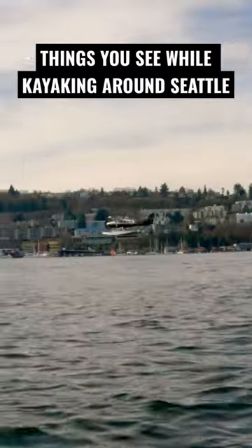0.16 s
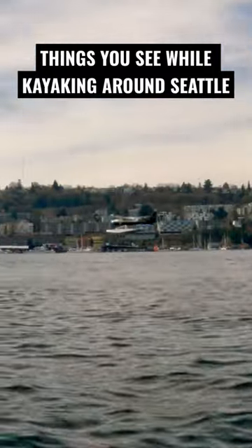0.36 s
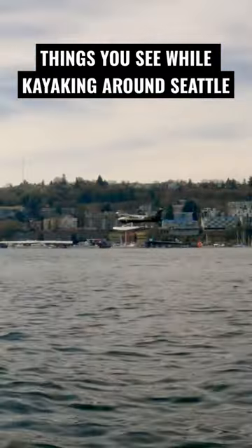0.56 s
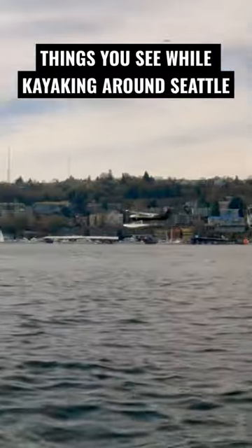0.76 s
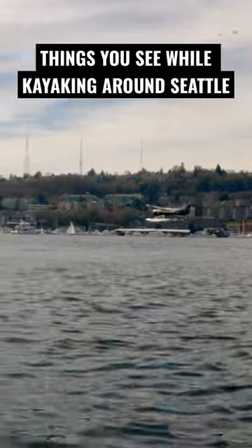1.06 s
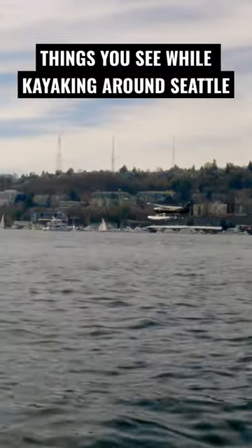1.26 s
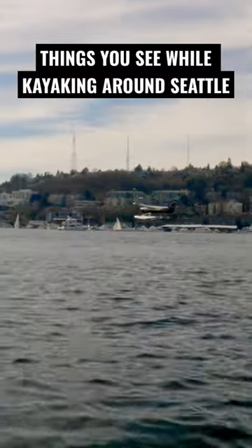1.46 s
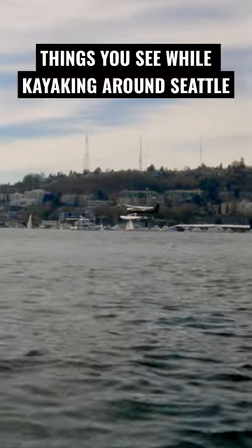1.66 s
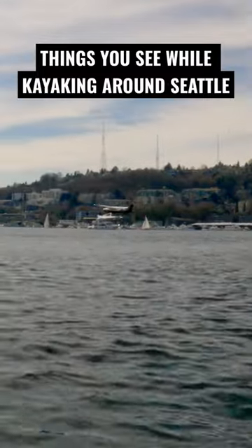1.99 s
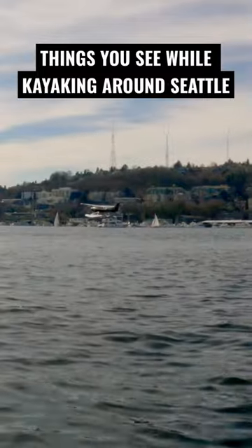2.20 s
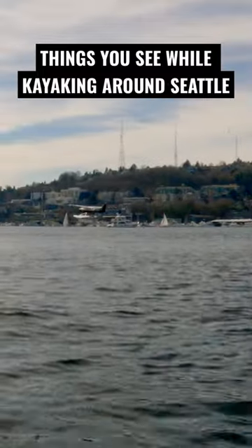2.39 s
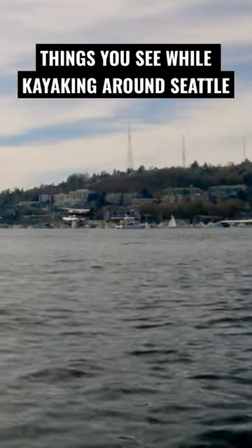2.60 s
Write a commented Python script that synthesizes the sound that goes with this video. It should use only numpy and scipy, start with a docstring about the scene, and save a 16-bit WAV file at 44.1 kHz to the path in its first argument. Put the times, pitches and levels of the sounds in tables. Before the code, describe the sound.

A small seaplane engine drones low across a lake, pitch sagging, while waves slap a kayak hull

```python
"""On a lake, from a kayak: a small seaplane drones low over the water, its pitch sagging as it moves away.
The engine is a stack of sines at multiples of its shaft rate, which swell and fade, over a roar of shaped noise.
Close by, noise bursts splash and tick on the hull and decaying sines make it thump.
Farther off, shaped noise and ringing bubbles make the waves, low noise the breeze, and one sine a faint hum.
Two closely spaced microphone ports hear it all, with small differences of level and phase."""
import sys
import numpy as np
from scipy.fft import rfft, irfft, next_fast_len
from scipy.io import wavfile
from scipy.ndimage import map_coordinates

SR = 44100
rng = np.random.default_rng(int(sys.argv[2]) if len(sys.argv) > 2 else 0)


def transcribe(signal):
    """Save signal, clipped to [-1, 1], as a 16-bit WAV file at the path in sys.argv[1]."""
    frames = np.atleast_2d(signal).T
    limited = np.clip(frames, -1, 1)
    pcm = np.round(limited * 32767).astype(np.int16)
    wavfile.write(sys.argv[1], SR, pcm)


N = 120834

# THE SEAPLANE
# Firing rate of the engine, twice the shaft rate: start_s, pitch_hz
FIRING_RATE = [(0, 93.64), (.3, 92.04), (.5, 91.93), (.8, 90.1), (1.1, 88.94), (1.55, 88.85), (1.75, 87.4),
               (2.3, 86.9), (2.5, 85.42), (2.74, 85.2)]
# Firing tone, before a slight waver: start_s, level_db
FIRING_LEVEL = [(0, -19), (.22, -21), (.32, -16.5), (.5, -14.5), (.72, -18.5), (.95, -18), (1.04, -20.5),
                (1.33, -15.5), (1.55, -17), (1.7, -26), (1.95, -18.5), (2.2, -18), (2.38, -21.5),
                (2.5, -30.5), (2.58, -25), (2.74, -20)]
# Third shaft order, beating with the firing tone, before its waver: start_s, level_db
THIRD_ORDER_LEVEL = [(0, -31), (.13, -28.5), (.4, -28), (.55, -33.5), (.68, -38.5), (.78, -30), (.95, -29),
                     (1.07, -37.5), (1.17, -29.5), (1.33, -31.5), (1.42, -27), (1.6, -29.5), (1.71, -42.5),
                     (1.83, -27), (2.02, -30.5), (2.17, -35), (2.33, -30.5), (2.74, -33.5)]
# Overtones that swell and fade in turn, before their flutter: shaft_order, crest_s, half_length_s, level_db
OVERTONE_SWELLS = [(4, 0.056, .15, -38.5), (4, 1.09, 0.85, -39), (4, 2.5, 0.41, -34.5),
                   (5, 0.16, .1, -33.5), (5, .47, .14, -35.5), (5, 1.1, 0.48, -39), (7, .1, .25, -47),
                   (8, 0.33, 0.49, -43), (9, 0.32, 0.46, -49.5), (10, 1.15, 0.19, -45.5),
                   (10, 1.2, 0.59, -53), (11, 0.44, .28, -49), (12, 2.4, 0.39, -45), (13, 1.3, 0.48, -54.5)]
# Air turbulence on the overtones: dB per order, radians per order, random knots per second
FLUTTER_DB, PHASE_WANDER_RAD, FLUTTER_PER_S = 0.2941, 0.082, 16
# Diffuse roar, before ROAR_DB and a slight waver: start_s, level_db
ROAR_LEVEL = [(0, -36), (.4, -38), (.72, -40), (1.03, -38.7), (1.4, -39.5), (1.7, -41), (2.05, -40),
              (2.25, -41), (2.74, -40.7)]
# Spectrum of the roar, relative: pitch_hz, density_db
ROAR_SPECTRUM = [(90, -14.5), (140, 4.5), (220, 3), (330, 1), (410, -2), (520, 0.5), (680, -4.5),
                 (820, -10), (1000, -5.5), (1300, -13.5), (1700, -16.5), (2600, -27), (5000, -81)]
ROAR_DB = 4
PULSE_DEPTH = 0.049  # swing of the roar at the firing rate, and again at the shaft rate

# THE HULL, at arm's length
# Waves on the hull: start_s, splash_db, thump_db
HULL_SLAPS = [(0.064, -30.5, -32), (0.108, -30, -19.5), (0.156, -38, -25.5), (0.191, -41.5, -28),
              (0.251, -32, -21), (0.337, -30, -33), (.805, -29, -16), (1.037, -34.5, -28.5),
              (2.071, -25, -12.5), (2.573, -30.5, -26), (2.609, -40, -24.5)]
# Spectrum of a splash, relative: pitch_hz, density_db
SPLASH_SPECTRUM = [(150, 5.5), (290, 9.5), (400, 4.5), (520, 7.5), (750, -2.5), (1000, 2.5), (1500, -4.5),
                   (2700, -9.5), (4000, -14.5), (7000, -44), (11000, -66.5)]
SPLASH_RISE_S, SPLASH_T60_S, SPLASH_GRAIN_DB = .003, 0.048, 1.8
SPLASH_PAN_DB = 3  # left above right
SPRAY_DB, SPRAY_RISE_S, SPRAY_T60_S = -17, 0.024, .22  # level relative to the splash
HULL_HZ, HULL_RISE_S, HULL_T60_S = 101.3, 0.017, 0.18
HULL_RING_HZ, HULL_RING_DB = 269, -21  # a weaker, higher mode, relative to the main one
# Droplets: start_s, level_db
DROPLETS = [(0.067, -48.5), (0.109, -44.5), (0.408, -51), (0.441, -53), (1.037, -48.5), (1.996, -43.5),
            (2.571, -55.5), (2.606, -58)]
# Spectrum of a droplet's tick, relative: pitch_hz, density_db
DROPLET_SPECTRUM = [(2500, -9), (4000, 0), (5000, 17.5), (6200, 2.5), (7800, 1.5), (10000, -21.5),
                    (12000, -23)]
DROP_RISE_S, DROP_T60_S = .0014, .021

# THE WATER AROUND
# Wash of small waves, before WASH_DB and a slight waver: start_s, level_db
WASH_LEVEL = [(0, -47), (.2, -46.5), (.3, -46.5), (.45, -42), (.55, -45), (.75, -47.5), (1.3, -47.5),
              (1.6, -50), (1.68, -52.5), (1.85, -50), (2.1, -50), (2.35, -48), (2.74, -47.5)]
# Spectrum of the wash, relative: pitch_hz, density_db
WASH_SPECTRUM = [(600, -38.5), (1500, -5), (2200, 1), (2700, 1.5), (3200, -3), (3900, -9), (4700, -40.5),
                 (6000, -23.5), (9000, -45.5), (12000, -80)]
# Fine hiss of the water, before HISS_DB and its waver: start_s, level_db
HISS_LEVEL = [(0, -58.5), (.25, -57.5), (.45, -57), (.58, -63), (.85, -60), (.98, -58.5), (1.05, -57),
              (1.2, -56), (1.4, -58.5), (1.58, -57), (1.68, -59), (1.83, -55), (1.95, -57), (2.1, -55.8),
              (2.28, -67), (2.74, -68)]
# Spectrum of the hiss, relative: pitch_hz, density_db
HISS_SPECTRUM = [(2000, -41), (3400, 2), (4200, 3.5), (5250, 0.5), (6000, -16.5), (7500, -16), (8500, -25),
                 (10000, -31.5), (12000, -55)]
WASH_DB, HISS_DB = 0, 3.5
# Bubbles: range of ring levels, level relative to the wash noise, cycles for a ring to fall 60 dB
BUBBLE_SPREAD_DB, BUBBLE_DB, BUBBLE_CYCLES = 15.5, -4, 33
# A small wave swirling past the hull: start_s, level_db
SWIRL_LEVEL = [(0, -51.5), (.13, -41), (.25, -52), (.33, -52), (.44, -46), (.6, -61), (.9, -69.5)]
SWIRL_HZ, SWIRL_WIDTH_HZ, SWIRL_ROUGH_DB = 2320, 820, 2.5
# Spurting crests: start_s, centre_hz, level_db
CREST_SPURTS = [(.343, 3790, -46.5), (0.373, 3080, -44), (0.444, 4750, -51.5), (0.467, 3480, -43),
                (.605, 3380, -51.5), (1.268, 3670, -49), (1.549, 3720, -48), (1.783, 4730, -48),
                (1.867, 3600, -51), (1.913, 2960, -50), (2.23, 3100, -43)]
SPURT_RISE_S, SPURT_T60_S, SPURT_WIDTH_HZ = 0.0051, 0.057, 900

# THE AIR AND THE FAR WATER
# Spectrum of the breeze's rumble, relative: pitch_hz, density_db
WIND_SPECTRUM = [(12, -8), (28, -7), (43, 0), (56, 2.5), (71, 6), (85, 1), (120, 0.5), (200, -8),
                 (500, -68.5)]
WIND_DB, WIND_LUMPS_DB = -36, 1.6
# Soft whoosh drifting through the midrange: start_s, centre_hz, level_db
WHOOSH_DRIFT = [(0, 1000, -53), (.7, 1000, -56.5), (1.0, 1050, -51), (1.33, 1100, -42.5),
                (1.55, 1150, -49.5), (1.8, 1261, -42), (1.95, 1200, -48), (2.13, 1050, -43),
                (2.4, 950, -60.5), (2.74, 950, -71)]
WHOOSH_WIDTH_HZ = 640
# Higher hum, before its throb: start_s, level_db
HUM_LEVEL = [(0, -52), (1.0, -47), (1.6, -43.5), (1.95, -39), (2.3, -37), (2.74, -37)]
HUM_HZ, HUM_WANDER_RAD = 303, .33
HUM_THROB_PER_S, HUM_CREST_S, HUM_DEPTH = 10.3, 2.12, .75

# THE MICROPHONE PORTS
# Balance: pitch_hz, left_minus_right_db
LEFT_RIGHT_BALANCE = [(250, 0), (700, 1.5), (1050, 3.3), (1550, 5), (2400, 2.5), (3200, 0), (3650, -5),
                      (4050, -14), (4800, -2), (5600, 0), (7000, -4), (8500, 0)]
# Phase by which the left port lags: pitch_hz, lag_radians
LEFT_LAG = [(300, 0), (1050, .1), (2000, .85), (3200, 1.9), (3800, 2.8), (4300, 5.6), (5400, 6.25),
            (6500, 6.8), (7700, 5.8), (9000, 6.28)]
# Likeness of diffuse sound at the two ports: pitch_hz, correlation (1 is identical)
PORT_LIKENESS = [(40, .997), (110, 0.97), (200, 1), (330, 0.98), (700, 0.98), (1400, 0.92), (2800, 0.84),
                 (5000, 0.76)]
TOP_HZ = 12300

HALVES = np.array([[.5], [-.5]])  # shares a left-minus-right difference between the ports


def engine():
    """Shaft orders, the firing tone far the strongest, over a roar that pulses at firing and shaft rates."""
    firing_hz, = curves(FIRING_RATE)
    shaft = np.pi * np.cumsum(firing_hz) / SR  # shaft angle: two firings a turn

    def tone(order, wander):
        start = rng.uniform(0, 2 * np.pi)
        return np.sqrt(2) * np.sin(order * shaft + start + wander)

    firing_gain = amp(curves(FIRING_LEVEL)[0] + 0.1 * wobble(32))
    third_gain = amp(curves(THIRD_ORDER_LEVEL)[0] + 1.2 * wobble(14))
    lines = firing_gain * tone(order=2, wander=0.044 * wobble(16))
    lines += third_gain * tone(order=3, wander=.2 * wobble(12))
    lines += overtones(tone)
    pulsing = unit(1 + PULSE_DEPTH * (np.cos(2 * shaft) + np.cos(shaft)))
    roar_gain = amp(curves(ROAR_LEVEL)[0] + ROAR_DB + 0.53 * wobble(22))
    return lines + roar_gain * pulsing * rush(ROAR_SPECTRUM)


def overtones(tone):
    """Higher shaft orders, each under bell-shaped swells; turbulence flutters the higher ones more."""
    t = np.arange(N) / SR
    total = np.zeros(N)
    for k in sorted({round(row[0]) for row in OVERTONE_SWELLS}):
        swells = [amp(db) * np.exp(-.5 * ((t - crest_s) / half_s) ** 2)
                  for order, crest_s, half_s, db in OVERTONE_SWELLS if round(order) == k]
        flutter = amp(FLUTTER_DB * k * wobble(FLUTTER_PER_S))
        wander = PHASE_WANDER_RAD * k * wobble(FLUTTER_PER_S)
        total += np.max(swells, axis=0) * flutter * tone(k, wander)
    return total


def hull():
    """Waves splash on the hull and trail spray, its two modes thump, and a few droplets tick."""
    splash, thump = 0, 0
    for s, splash_db, thump_db in HULL_SLAPS:
        spray = amp(SPRAY_DB) * burst(s, SPRAY_RISE_S, SPRAY_T60_S)
        splash = splash + amp(splash_db) * (burst(s, SPLASH_RISE_S, SPLASH_T60_S) + spray)
        t = since(s)
        ring = np.sin(2 * np.pi * HULL_HZ * t) + amp(HULL_RING_DB) * np.sin(2 * np.pi * HULL_RING_HZ * t)
        thump = thump + amp(thump_db) * burst(s, HULL_RISE_S, HULL_T60_S) * ring
    grain = unit(amp(SPLASH_GRAIN_DB * wobble(400)))
    splashes = splash * grain * rush(SPLASH_SPECTRUM) * amp(SPLASH_PAN_DB * HALVES)
    ticks = sum(amp(db) * burst(s, DROP_RISE_S, DROP_T60_S) for s, db in DROPLETS)
    return splashes + thump + ticks * rush(DROPLET_SPECTRUM)


def water():
    """Small waves wash and hiss, with a fine grain of bubbles; one swirls past and little crests spurt."""
    wash_gain = amp(curves(WASH_LEVEL)[0] + WASH_DB + 0.34 * wobble(25))
    wash = wash_gain * (rush(WASH_SPECTRUM) + amp(BUBBLE_DB) * bubbles())
    hiss_gain = amp(curves(HISS_LEVEL)[0] + HISS_DB + 1.1 * wobble(25))
    hiss = hiss_gain * unit(amp(2.4 * wobble(500)) * rush(HISS_SPECTRUM))
    rough_band = unit(amp(SWIRL_ROUGH_DB * wobble(150)) * band(SWIRL_HZ, SWIRL_WIDTH_HZ))
    swirl = amp(curves(SWIRL_LEVEL)[0]) * rough_band
    spurts = sum(amp(db) * burst(s, SPURT_RISE_S, SPURT_T60_S) * band(hz, SPURT_WIDTH_HZ)
                 for s, hz, db in CREST_SPURTS)
    return wash + hiss + swirl + spurts


def bubbles(count=700):
    """Tiny bubbles burst at random, each a decaying sine; the wash spectrum shapes them, rms 1."""
    when, pitch, size = rng.random((count, 3)).T[..., None]
    hz = 1300 * 4 ** pitch
    t = np.arange(SR // 100) / SR
    decay = np.exp(-hz * t * np.log(1000) / BUBBLE_CYCLES)
    rings = amp(BUBBLE_SPREAD_DB * size ** 2) * np.sin(2 * np.pi * hz * t) * decay
    at = (when * N).astype(int) + np.arange(len(t))
    fizz = np.bincount(at.ravel(), rings.ravel(), N)[:N]
    return unit(filtered(fizz, lambda hz: amp(along(WASH_SPECTRUM, hz))))


def breeze():
    """Moving air: a lumpy low rumble and a drifting band of whoosh."""
    rumble = amp(WIND_DB + WIND_LUMPS_DB * wobble(8)) * rush(WIND_SPECTRUM)
    centre_hz, level_db = curves(WHOOSH_DRIFT)
    return rumble + amp(level_db) * band(centre_hz, WHOOSH_WIDTH_HZ)


def hum():
    """Perhaps another motor across the water: one wavering sine that throbs about ten times a second."""
    t = np.arange(N) / SR
    throb = 1 + HUM_DEPTH * np.cos(2 * np.pi * HUM_THROB_PER_S * (t - HUM_CREST_S) + .3 * wobble(5))
    tone = np.sqrt(2) * np.sin(2 * np.pi * HUM_HZ * t + HUM_WANDER_RAD * wobble(22))
    return amp(curves(HUM_LEVEL)[0]) * throb * tone


def rush(spectrum):
    """Diffuse noise of rms 1; shared and opposed parts set how alike the ports are at each pitch."""
    def shared_and_opposed(hz):
        angle = np.arccos(np.clip(along(PORT_LIKENESS, hz), 0, 1)) / 2
        return amp(along(spectrum, hz)) * [np.cos(angle), np.sin(angle)]
    mid, side = filtered(rng.standard_normal((2, N)), shared_and_opposed)
    return unit(np.array([mid + side, mid - side]))


def band(centre_hz, width_hz):
    """A band of noise of rms 1: slow random curves carried up to a fixed or moving centre."""
    phase = 2 * np.pi * np.cumsum(centre_hz * np.ones(N)) / SR
    return unit(wobble(width_hz) * np.cos(phase) + wobble(width_hz) * np.sin(phase))


def burst(s, rise, t60):
    """An envelope of peak 1 that rises smoothly and dies away exponentially."""
    t = since(s)
    envelope = (1 - np.exp(-(t / rise) ** 2)) * np.exp(-np.log(1000) * t / t60)
    return envelope / envelope.max()


def since(s):
    """Seconds since a moment, zero before it."""
    return np.maximum(np.arange(N) / SR - s, 0)


def wobble(rate):
    """A smooth random curve through normal draws, rate knots a second."""
    knots = rng.standard_normal(N // 8)
    return map_coordinates(knots, [np.arange(N) * rate / SR], mode="wrap")


def curves(rows):
    """One value per sample for each column after the time."""
    s, *columns = np.transpose(rows)
    return [np.interp(np.arange(N) / SR, s, column) for column in columns]


def along(points, hz):
    """Read (pitch_hz, value) points on a log frequency axis."""
    f, v = np.transpose(points)
    return np.interp(np.log(hz + 1), np.log(f + 1), v)


def filtered(x, response):
    """Multiply the spectrum of x by a response of frequency, padded so the end does not wrap round."""
    m = next_fast_len(N + SR // 2)
    return irfft(rfft(x, m) * response(np.fft.rfftfreq(m, 1 / SR)), m)[..., :N]


def amp(db):
    """Decibels to gain."""
    return 10 ** (np.asarray(db) / 20)


def unit(x):
    """Scale to rms 1."""
    return x / np.sqrt(np.mean(x ** 2) + 1e-20)


def scene():
    """The plane, the hull under the listener, the lake, the air and the far hum."""
    return engine() + hull() + water() + breeze() + hum()


def record(dry):
    """The two ports differ in level and phase by pitch; nothing is kept above the band limit."""
    def ports(hz):
        gains = amp(along(LEFT_RIGHT_BALANCE, hz) * HALVES)
        even_gains = gains / np.sqrt(np.mean(gains ** 2, axis=0))  # mean power of the pair stays 1
        return even_gains * np.exp(-1j * along(LEFT_LAG, hz) * HALVES)
    return filtered(filtered(dry, ports), lambda hz: hz < TOP_HZ)


dry = scene()
out = record(dry)
transcribe(out)
```